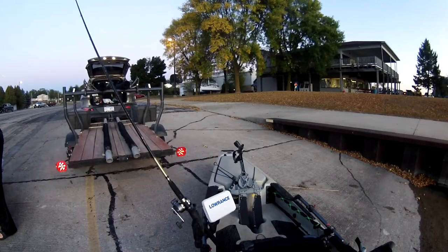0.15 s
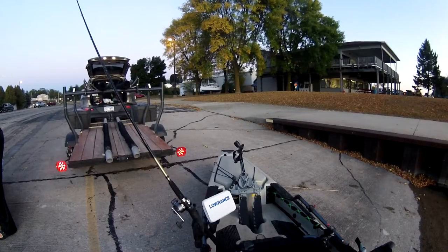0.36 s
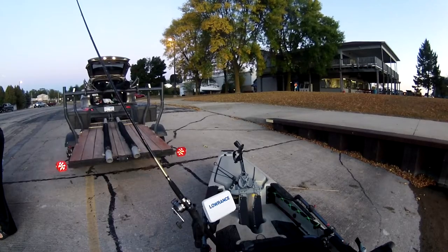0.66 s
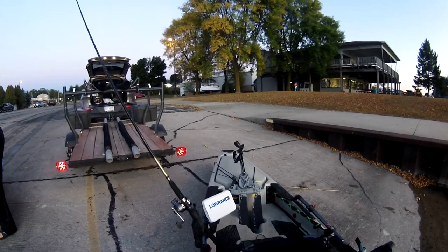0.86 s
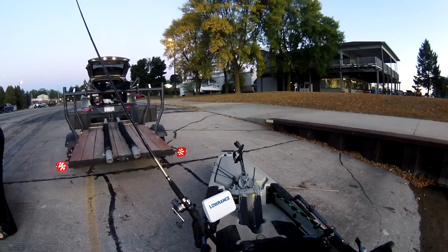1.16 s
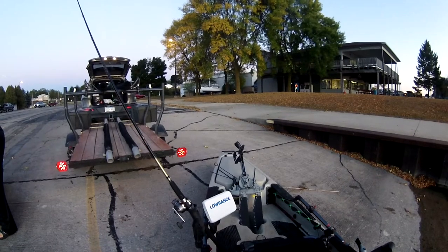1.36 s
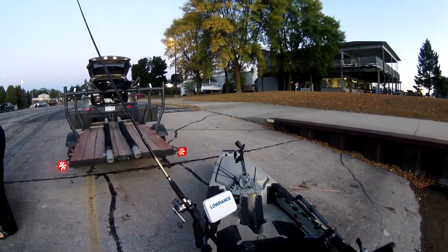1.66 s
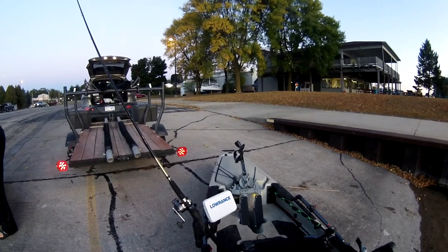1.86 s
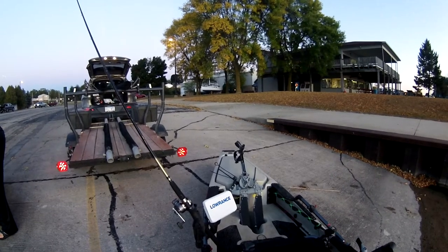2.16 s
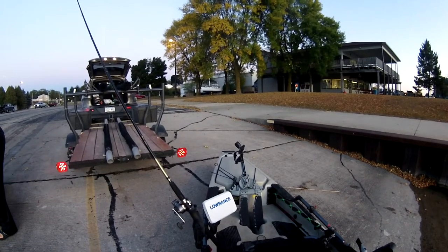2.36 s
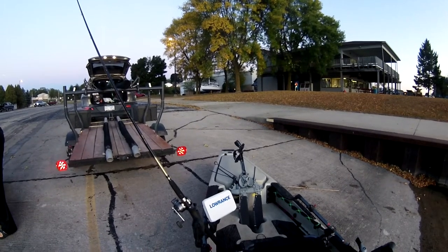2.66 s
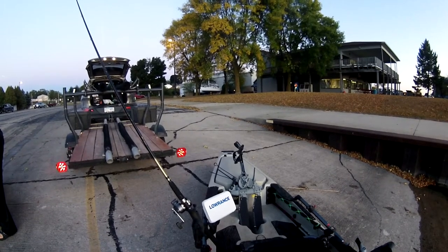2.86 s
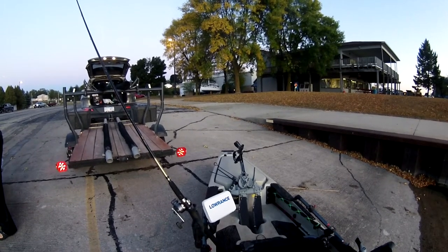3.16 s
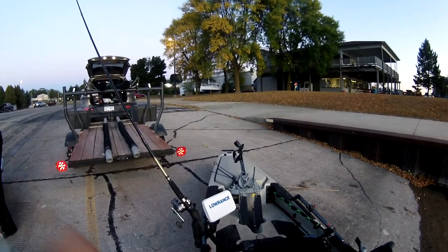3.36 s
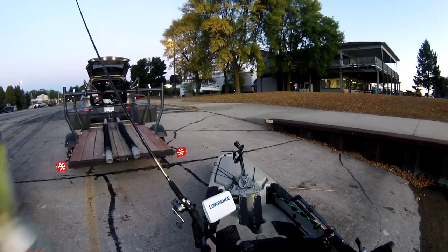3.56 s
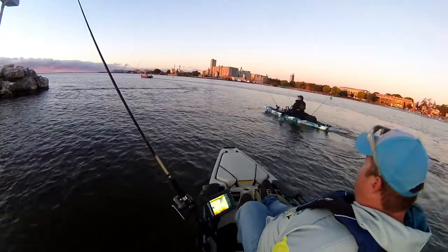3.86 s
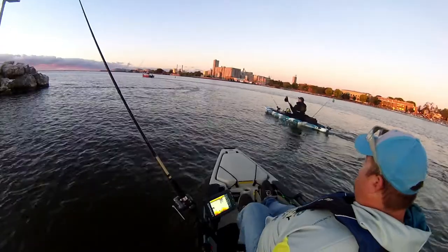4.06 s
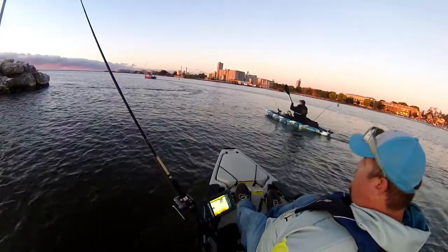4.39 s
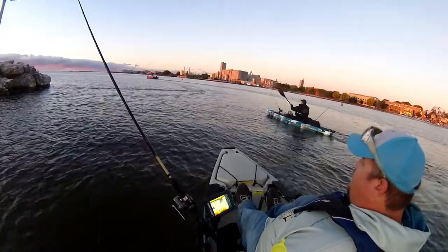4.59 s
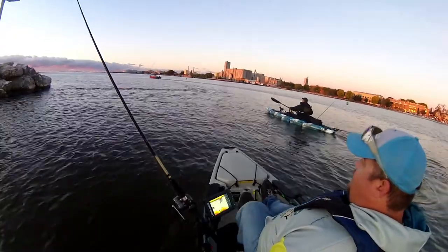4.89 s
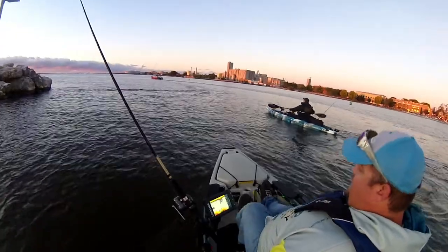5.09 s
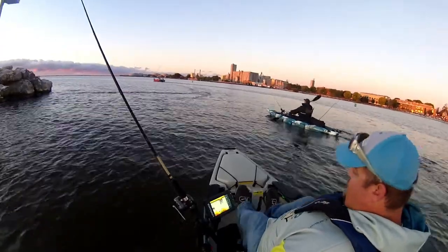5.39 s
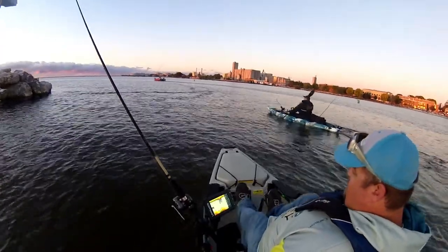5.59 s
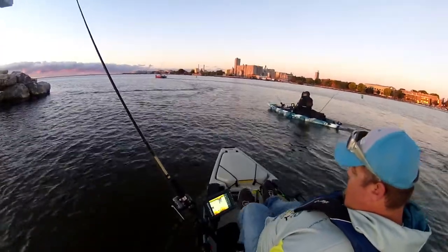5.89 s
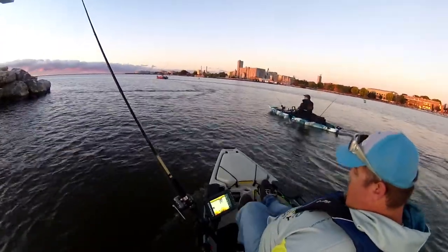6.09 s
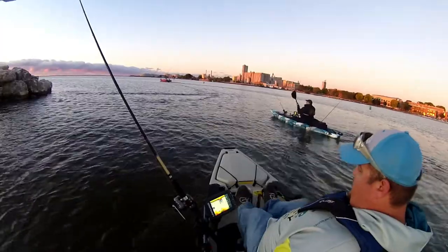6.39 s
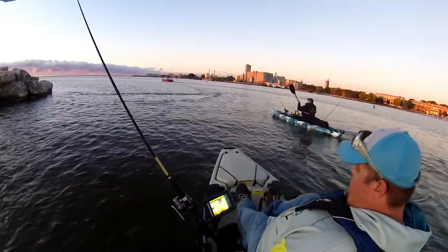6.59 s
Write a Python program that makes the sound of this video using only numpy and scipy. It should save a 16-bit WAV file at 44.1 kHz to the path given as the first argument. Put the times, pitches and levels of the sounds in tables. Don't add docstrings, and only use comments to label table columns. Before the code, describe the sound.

A quiet boat ramp: very faint far traffic and an idling truck's hum, a few barely audible bumps on hollow plastic, then one sharp click. After a tiny silence the sound jumps to open water, much louder: steady wash along a kayak hull, gurgling air pockets, paddle drips, crisp droplet pops and soft low wind buffeting. A small microphone sits very close to the water.

```python
import sys
import numpy as np
from scipy import signal
from scipy.fft import rfft, irfft, next_fast_len
from scipy.io import wavfile
from scipy.ndimage import uniform_filter1d

SR = 44100
rng = np.random.default_rng(int(sys.argv[2]) if len(sys.argv) > 2 else 0)


def int16_out(signal):
    q = np.round(np.clip(np.atleast_2d(signal).T, -1, 1) * 32767)
    wavfile.write(sys.argv[1], SR, q.astype(np.int16))


def natural_amplitude(level_db):
    exponent = np.asarray(level_db, float) / 20
    return 10 ** exponent


N = 297234
CUT_OUT_S, CUT_IN_S = 3.586, 3.653


def rms_one(x):
    return x / np.sqrt(np.mean(x ** 2) + 1e-20)


def add(out, s, shape):
    at = round(s * SR)
    out[at:at + len(shape)] += shape[:max(N - at, 0)]


def drift(rate_hz):
    coarse = 40
    r = np.exp(-2 * np.pi * coarse * rate_hz / SR)
    noise = rng.standard_normal(N // coarse + 2002)
    slow = signal.lfilter([1], [1, -2 * r, r * r], noise)[2000:]
    return np.interp(np.arange(N) / coarse, np.arange(len(slow)), rms_one(slow))


def bands(spectrum, patchy_db):
    size = next_fast_len(N)
    hz = np.arange(1, size // 2 + 2) * SR / size
    points = np.array(spectrum)
    level_db = np.interp(np.log(np.minimum(hz, 12650)), np.log(points[:, 0]), points[:, 1])
    shaped = rfft(rng.standard_normal(size)) * natural_amplitude(level_db)
    together = drift(11.3)
    for centre in 20 * 2 ** np.arange(0, 9.6, 0.5):
        window = np.cos(np.pi * np.clip(np.log2(hz / centre), -0.5, 0.5)) ** 2
        flicker_db = patchy_db * (0.37 * together + drift(50.0))
        yield centre, irfft(shaped * window, size)[:N] * natural_amplitude(flicker_db)


def ring(clicks, hz, t60):
    r, w = natural_amplitude(-60 / (t60 * SR)), 2 * np.pi * hz / SR
    return signal.lfilter([0, np.sin(w)], [1, -2 * r * np.cos(w), r * r], clicks + 1e-18)


def strike(modes, s, level_db, tilt=0):
    out, at = np.zeros(N), np.round(np.asarray(s) * SR).astype(int)
    for k, (hz, db, t60) in enumerate(modes):
        clicks = np.zeros(N)
        clicks[at] = natural_amplitude(level_db + db + tilt * np.log2(hz / 250))
        out += ring(clicks, hz, t60) * (-1) ** k
    return out


def burst(length_s):
    part = np.linspace(0, 1, round(length_s * SR))
    return np.minimum(part / 0.084, 1) * (1 - part ** 2.7)


def bubble(hz, cycles, rise, swell):
    turns = np.arange(round(cycles * SR / hz)) * hz / SR
    shape = (1 - np.exp(-turns / swell)) ** 2 * natural_amplitude(-40 * turns / cycles)
    return shape / shape.max() * np.sin(2 * np.pi * turns * (1 + rise * turns / cycles))


def bubble_row(rows, trim_db, cycles, rise, swell, pitch=1):
    out = np.zeros(N)
    for s, db, hz in rows:
        add(out, s, natural_amplitude(db + trim_db) * bubble(hz * pitch, cycles, rise, swell))
    return out


def breeze(calm_db, puffs, slower):
    rise_s, fall_s = 0.071, 0.06
    s, db = np.transpose(puffs)[:, :, None]
    t = np.arange(0, N / SR, 1 / 200)
    late = (t - s) / slower
    puff = np.exp(-2 * np.maximum(-late / rise_s, late / fall_s))
    power = natural_amplitude(2 * calm_db) + np.sum(natural_amplitude(2 * db) * puff, axis=0)
    return np.interp(np.arange(N) / SR, t, np.sqrt(power))


# (time [s], peak level [dB], pitch [Hz])
GLUGS = [(3.679, -31, 434), (3.712, -27, 804), (3.902, -32, 560), (4.01, -25.5, 568), (4.012, -24.5, 815),
         (4.619, -26.5, 830), (4.893, -40, 580), (4.941, -29, 577), (4.985, -27.5, 717), (5.219, -31, 1101),
         (5.31, -30, 470), (5.32, -29, 910), (5.175, -35, 1890), (5.219, -27, 694), (5.648, -30, 465),
         (5.746, -27.5, 786), (5.85, -35, 2100), (5.868, -36, 2330), (5.882, -29, 322), (5.891, -33.5, 494),
         (6.013, -34, 530), (6.171, -39, 910), (6.276, -35, 434), (6.385, -29, 482), (6.42, -18.5, 786),
         (6.421, -22.5, 917), (6.441, -25, 900), (6.5, -31.5, 299), (6.696, -28, 1000)]


def glugs():
    return bubble_row(GLUGS, trim_db=-3, cycles=18.5, rise=0.065, swell=0.46)


# (time [s], peak level [dB], pitch [Hz])
PLOPS = [(3.6986, -30.5, 1560), (3.7273, -32, 1920), (3.792, -31.5, 1350), (3.8433, -32, 1330),
         (3.933, -28.5, 1230), (4.2617, -37, 1560), (4.4237, -30, 1640), (4.5015, -29, 2077),
         (4.5574, -27, 1400), (4.6173, -27.5, 1370), (4.7796, -31, 1160), (5.023, -28, 1570),
         (5.029, -27, 1900), (5.0918, -28, 1040), (5.4708, -27, 1600), (5.4838, -30, 2270),
         (5.4836, -21, 1800), (5.5416, -27.5, 1340), (5.5556, -25.5, 1519), (6.2957, -19, 2630),
         (6.01, -29, 1140), (6.024, -28, 1320), (6.095, -32, 1280), (6.1166, -29, 1780),
         (6.3064, -27, 1800), (6.33, -30, 1850), (6.3485, -28, 1600), (6.484, -31, 1990),
         (6.501, -28, 1700), (6.7168, -22, 1360)]


def plops():
    climb = 0.073
    return bubble_row(PLOPS, trim_db=-4.0, cycles=29, rise=climb, swell=1.1, pitch=1 - 0.31 * climb)


# (time [s], peak level [dB], pitch [Hz])
DRIPS = [(3.9657, -30, 2300), (3.9665, -30, 4000), (4.051, -32, 2300), (4.0954, -25, 3280),
         (4.1149, -30, 3900), (4.1263, -25, 3700), (4.142, -28, 4900), (4.1942, -30, 2580),
         (4.195, -26, 4600), (4.2338, -31, 2803), (4.6312, -24.5, 3340), (4.6487, -30, 3990),
         (4.909, -32, 2520), (4.942, -32, 2510), (5.0657, -22.5, 3720), (5.1465, -31.5, 2600),
         (5.3231, -28.5, 3010), (5.4174, -30, 4070), (5.6527, -34, 5200), (5.7811, -31, 3930),
         (5.9287, -28.5, 3620), (6.0594, -27.5, 2430), (6.2, -31, 2470), (6.266, -37, 5470),
         (6.3722, -29, 2600), (6.3887, -30, 4770), (6.4845, -23.5, 2700), (6.5039, -31, 3000),
         (6.5154, -31, 5240), (6.71, -28.5, 2830)]


def drips():
    return bubble_row(DRIPS, trim_db=-3, cycles=27, rise=0.065, swell=0.46)


# (time [s], peak level [dB], pitch [Hz])
BURSTS = [(3.73, -26, 8050), (3.941, -27.5, 8530), (4.0192, -33, 7920), (4.1694, -35, 6780),
          (4.196, -31.5, 6800), (4.335, -30, 8240), (4.363, -32.5, 7740), (4.6407, -28.5, 8200),
          (4.756, -34, 8200), (4.804, -39, 8000), (4.903, -30, 8000), (4.9486, -34, 8450),
          (4.843, -34, 8000), (4.9749, -32, 7090), (5.443, -33, 7660), (5.484, -21, 8000),
          (5.653, -34, 6960), (5.811, -31, 7900), (6.0867, -26.5, 7900), (6.1098, -32, 6900),
          (6.3316, -34, 7600), (6.357, -27, 8200), (6.3882, -35, 6410), (6.396, -32, 8000),
          (6.417, -34, 8200), (6.5149, -30.5, 8300)]


def port_bursts():
    return bubble_row(BURSTS, trim_db=1.5, cycles=26.5, rise=0, swell=0.98)


# (time [s], peak level [dB], pitch [Hz])
SLAP = [(5.465, -24, 4230), (5.467, -22.5, 2670), (5.4755, -29, 5200), (5.479, -15, 7660),
        (5.4835, -19, 5050), (5.488, -28, 4300), (5.4905, -16.5, 7900), (5.4912, -18.5, 3070),
        (5.4955, -26, 4200), (5.5, -32, 5170), (6.296, -21, 5000), (6.2929, -26, 3440), (6.298, -30, 8100)]


def slaps():
    return bubble_row(SLAP, trim_db=-3, cycles=22, rise=0.065, swell=0.46)


# (time [s], length [s], level [dB], droplet rate [1/s])
SPLASHES = [(3.727, 0.037, -36.5, 1100), (4.11, 0.069, -36.5, 360), (4.163, 0.067, -45, 280),
            (4.62, 0.022, -34, 900), (4.91, 0.15, -38.5, 370), (5.398, .04, -37, 450),
            (5.467, 0.041, -34, 1700), (5.483, 0.13, -43.5, 830), (6.087, 0.03, -67, 500),
            (6.291, 0.046, -32.5, 3700), (6.323, 0.21, -36.5, 1600), (6.48, 0.025, -48, 2000)]
DROPLET_HZ = [2300, 3000, 4100, 4900, 5500, 6100, 7450, 7900, 8240]


def splashes():
    gain, per_s = np.zeros((2, N))
    for s, length_s, db, rate in SPLASHES:
        add(gain, s, natural_amplitude(db) * burst(length_s) / np.sqrt(rate / SR))
        add(per_s, s, np.full(round(length_s * SR), rate))
    born = rng.random(N) < per_s / SR
    sizes = natural_amplitude(2.3 * rng.exponential(1, N)) * rng.choice([-1, 1], N)
    clicks = gain * born * sizes
    dealt = rng.integers(0, len(DROPLET_HZ), N)
    return 0.15 * sum(ring(clicks * (dealt == k), hz, 14.0 / hz) for k, hz in enumerate(DROPLET_HZ))


# (time [s], peak level [dB])
SNAPS = [(3.7296, -28), (3.846, -33), (4.195, -30), (4.619, -27), (4.641, -30), (5.0658, -32),
         (5.4655, -29), (5.4766, -19), (5.4783, -34), (5.4835, -17), (6.258, -28), (6.2695, -30),
         (6.311, -26), (6.312, -27), (6.3573, -26), (6.389, -29), (6.485, -34), (6.517, -28)]
# (pitch [Hz], level [dB], t60 [s])
HOUSING = [(2600, -7, 0.0035), (5100, 1, 0.0018), (7900, -6, 0.0035), (12500, -14, .002)]


def snaps():
    s, db = np.transpose(SNAPS)
    return strike(HOUSING, s, db)


def gurgle(count, level_db):
    out = np.zeros(N)
    for when, size, pitch, length, climb in rng.random((count, 5)):
        db = level_db - 2.16 * np.log(1 - 0.97 * size)
        pocket = bubble(450 * 6.0 ** pitch, 7.5 + 16.5 * length, 0.314 * climb, swell=1.34)
        add(out, CUT_IN_S + when * (N / SR - CUT_IN_S), natural_amplitude(db) * pocket)
    return out


def fizz(per_s, low_hz, high_hz, cycles, level_db):
    sizes = natural_amplitude(3.7 * np.minimum(rng.exponential(1, N), 4)) * rng.choice([-1, 1], N)
    born = rng.random(N) < per_s * natural_amplitude(4.0 * drift(7.0)) / SR
    dealt = rng.integers(0, 10, N)
    out = np.zeros(N)
    for k, hz in enumerate(np.geomspace(low_hz, high_hz, 10)):
        out += ring(sizes * born * (dealt == k), hz, cycles / hz)
    return natural_amplitude(level_db) * rms_one(out)


# (frequency [Hz], density [dB per Hz])
WASH = [(15, -41), (25, -13.5), (90, 1), (155, -2), (248, -1.5), (617, -7.5), (937, -8), (1180, -11),
        (1660, -12.5), (3190, -17), (4970, -16.5), (6280, -20), (7940, -17.5), (12700, -26), (16500, -61),
        (22000, -120)]
# (time [s], level [dB])
FLOW = [(3.67, -40.5), (3.9, -39.5), (4.6, -39.5), (4.8, -40.5), (5.05, -39), (5.4, -39), (5.6, -40),
        (5.8, -41), (6.25, -39), (6.33, -37), (6.6, -39.5), (6.74, -38)]
# (time [s], peak level [dB])
WATER_PUFFS = [(3.74, -45), (3.92, -38.5), (4.3, -48), (4.75, -37.5), (5.2, -75), (5.4, -42), (5.63, -42.5),
               (5.88, -40), (6.15, -44), (6.36, -47), (6.65, -41), (6.73, -40)]


def wash():
    layers = np.zeros((3, N))
    for hz, band in bands(WASH, patchy_db=1.41):
        layers[int(hz > 200) + int(hz > 2000)] += band
    flow_db = np.interp(np.arange(N) / SR, *np.transpose(FLOW))
    spray_db = -45.5 + 0.59 * (flow_db - np.mean(FLOW, axis=0)[1])
    gains = breeze(-45, WATER_PUFFS, slower=0.82), natural_amplitude(flow_db), natural_amplitude(spray_db)
    return sum(gain * rms_one(layer) for gain, layer in zip(gains, layers))


# (time [s], crack [dB], hollow body [dB], body tilt [dB per octave], scuff [dB])
KNOCKS = [
    (1.129, -64, -53, 21, -65),
    (1.143, -80, -62, 17, -75),
    (1.203, -80, -60, 15, -71),
    (1.484, -72, -69, 8, -74),
    (2.035, -84, -75, 2, -72),
    (2.331, -85, -66, -2, -64),
    (2.3684, -20.5, -44.5, -1, -55),
    (2.401, -63, -66, 0, -74),
    (2.69, -92, -62, -4, -82),
]
# (pitch [Hz], level [dB], t60 [s])
CRACK = [(2110, -1.5, 0.0046), (2940, 1.5, 0.0029), (3680, 0, 0.0027), (5500, -13, 0.0034),
         (7200, -14, 0.0046), (9240, -9.5, 0.0022), (11800, -18, 0.0038)]
# (pitch [Hz], level [dB], t60 [s])
HOLLOW = [(36, -13, .25), (145, -9, .15), (240, -3.5, 0.18), (330, -4, 0.04), (470, -15, 0.035)]


def knocks():
    s, crack_db, body_db, tilt, _ = np.transpose(KNOCKS)
    high = signal.butter(2, 1200, "high", fs=SR, output="sos")
    low = signal.butter(2, 600, "low", fs=SR, output="sos")
    crack = signal.sosfilt(high, strike(CRACK, s, crack_db))
    body = signal.sosfilt(low, strike(HOLLOW, s + 0.0029, body_db, tilt))
    rub = rng.standard_normal(N)
    rub = rms_one(ring(rub, 2360, 0.0013) + 0.27 * ring(rub, 7000, 0.00071))
    out = crack + body
    scuff = burst(0.014)
    for s, _, _, _, scuff_db in KNOCKS:
        add(out, s, natural_amplitude(scuff_db) * scuff * rub[round(s * SR):][:len(scuff)])
    return out


# (frequency [Hz], density [dB per Hz])
RAMP = [(15, -30), (25, 0), (37, -9), (49, -12.5), (108, -7), (140, -7), (181, -6), (261, -7.5),
        (282, -4.5), (366, -6.5), (407, -9.5), (866, -11), (3540, -27.5), (12700, -32), (16500, -62),
        (22000, -120)]
# (pitch [Hz], width [Hz], level [dB])
IDLE = [
    (295, 1.1, -81),
    (180, 11, -80.5),
    (380, 13, -81),
]
# (time [s], peak level [dB])
RAMP_PUFFS = [
    (1.58, -68),
    (2.4, -68.5),
    (2.9, -74),
]


def ramp_air():
    out = natural_amplitude(-66.5) * rms_one(sum(band for hz, band in bands(RAMP, patchy_db=1.5) if hz > 45))
    for hz, width, level_db in IDLE:
        out += natural_amplitude(level_db) * rms_one(ring(rng.standard_normal(N), hz, 2.2 / width))
    rumble = signal.butter(2, [18, 42], "band", fs=SR, output="sos")
    low = signal.sosfilt(rumble, rng.standard_normal(N))
    return out + breeze(-79, RAMP_PUFFS, slower=3.2) * rms_one(low)


# (frequency [Hz], density [dB per Hz])
HISS = [(60, -35), (300, -10.5), (700, -16.5), (1300, -28.5), (1800, -9), (2500, -3.5), (7500, -1),
        (9600, -1), (9800, -31), (13000, -23)]


def microphone_hiss():
    return rms_one(sum(band for hz, band in bands(HISS, patchy_db=1.3))) * [[1], [-1]]


def scene():
    t = np.arange(N) / SR
    hiss = microphone_hiss()
    ramp = knocks() + ramp_air() + natural_amplitude(-83) * hiss
    water = glugs() + plops() + drips() + port_bursts() + slaps() + splashes() + snaps()
    water += gurgle(count=600, level_db=-45.5)
    water += fizz(300, 2160, 7960, cycles=30.0, level_db=-52.5)
    water = water + wash() + natural_amplitude(-54.5) * hiss
    fade_out = np.clip((CUT_OUT_S - t) / 0.0083, 0, 1)
    fade_in = np.clip((t - CUT_IN_S) / 0.018, 0, 1) ** 2
    return ramp * fade_out + water * fade_in


def roll_off(x):
    return signal.sosfilt(signal.butter(12, 14100, fs=SR, output="sos"), x)


def record(dry):
    hz, t, cells = signal.stft(dry, SR, nperseg=1024)
    chance = rng.random((len(hz) // 6 + 1, len(t)))
    chance = uniform_filter1d(chance, size=4, axis=1)
    silent = chance < np.quantile(chance, 0.069)
    holes = np.repeat(silent, 6, axis=0)[:len(hz)] & (hz > 9100)[:, None]
    treble_edge = np.clip((12880 - hz) / 120, 0, 1)[:, None]
    kept = treble_edge * np.where(holes, natural_amplitude(-20), 1)
    mix = signal.istft(cells * kept, SR, nperseg=1024)[1][:, :N]
    return roll_off(mix)


dry = scene()
out = record(dry)
int16_out(out)
```